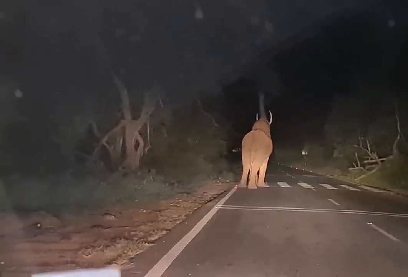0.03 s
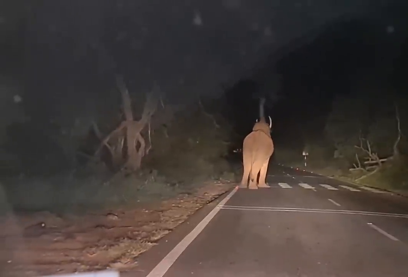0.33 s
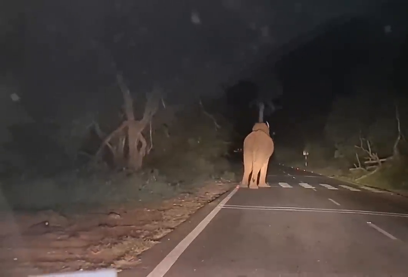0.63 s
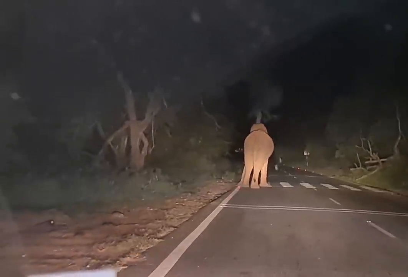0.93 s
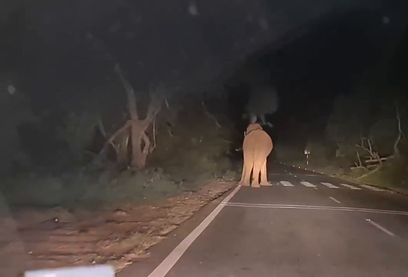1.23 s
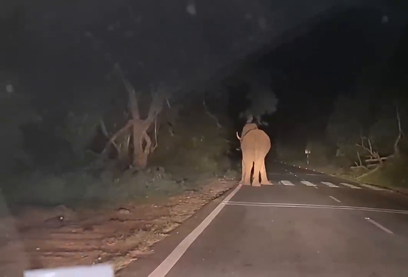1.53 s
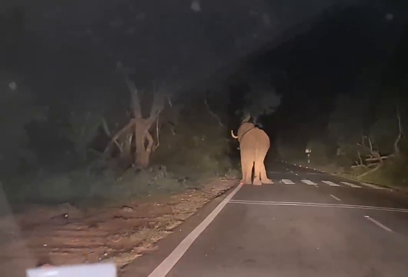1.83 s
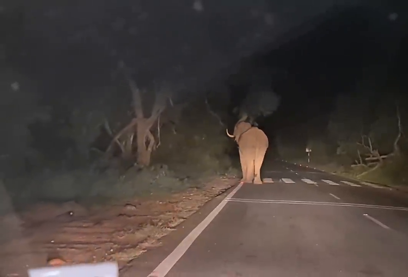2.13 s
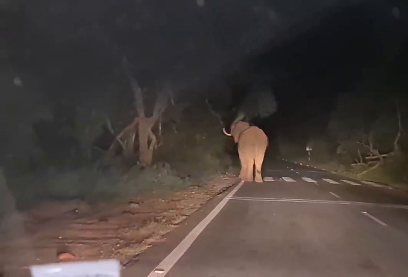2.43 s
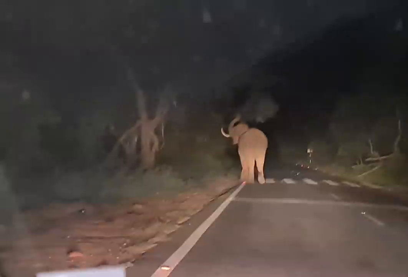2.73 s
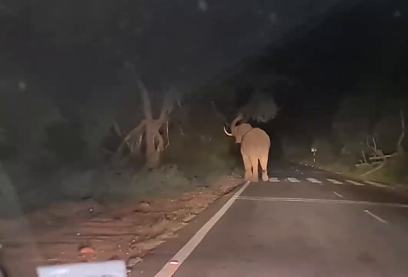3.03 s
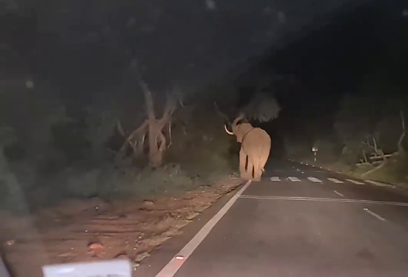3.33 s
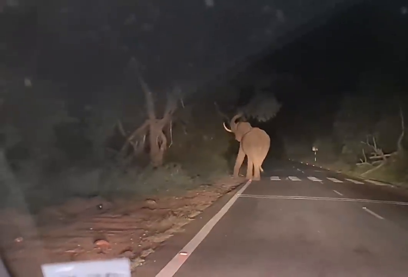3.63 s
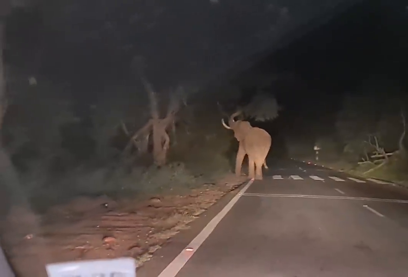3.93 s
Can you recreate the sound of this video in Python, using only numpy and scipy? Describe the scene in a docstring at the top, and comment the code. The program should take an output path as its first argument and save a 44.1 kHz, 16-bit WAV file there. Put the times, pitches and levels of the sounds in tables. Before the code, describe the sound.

Crickets chirp beside a forest road at night, a loud near one overlapping with a second about once a second. Farther crickets and thin, high insect trills continue behind them over a faint, low rumble.

```python
"""Night crickets by a forest road

A near cricket, a second farther off and distant ones chirp in turn. Each chirp is a run of
wing strokes, each stroke a gliding tone with a faint scrape. Small insects trill and lisp
high above them, over a far chorus, faint ticks and hoots, and a low, steady rumble."""
import sys
import numpy as np
from scipy import signal
from scipy.fft import rfft, irfft, next_fast_len
from scipy.io import wavfile
from scipy.ndimage import map_coordinates

SR = 44100
rng = np.random.default_rng(int(sys.argv[2]) if len(sys.argv) > 2 else 0)


def transcribe(u):
    """Save the signal u as a 16-bit wav file named by the first command-line argument.

    u: samples, shape (n,) or (channels, n), limited to [-1, 1]; the rate is SR.
    q: integer samples, one column per channel.
    """
    v = np.clip(np.atleast_2d(u).T, -1, 1)
    q = np.round(v * 32767).astype(np.int16)
    wavfile.write(sys.argv[1], SR, q)


N = 176400


def crickets():
    """Singers at three distances; the farther, the more sound arrives by way of the trees."""
    # chirps: first stroke t/s, last stroke t/s, level/dB, f/Hz
    near_chirps = [(.7370, 1.0050, -15.5, 3867), (1.6995, 1.9405, -14, 3872), (2.6680, 2.9085, -14, 3863),
                   (3.5845, 3.8110, -13.5, 3853)]
    second_chirps = [(-.2490, .0635, -20, 3802), (.7115, 1.0110, -18, 3846), (1.5815, 1.8950, -18.5, 3803),
                     (2.5065, 2.8215, -19, 3820), (3.3185, 3.5870, -19, 3812)]
    distant_chirps = [(-.110, .190, -35.5, 3854), (.593, .900, -32, 3810), (.790, 1.085, -32.5, 3832),
                      (1.466, 1.770, -32.5, 3794), (1.780, 2.080, -33, 3816), (2.345, 2.660, -33, 3806),
                      (2.640, 2.940, -31.5, 3810), (3.169, 3.480, -31.5, 3842), (3.700, 4.010, -39, 3893)]
    # one wing stroke: t/ms, pitch offset/Hz, levels of harmonics 1, 2, 3/dB
    near_stroke = [(0, 210, -13, -38, -42), (1.2, 160, -2, -34, -38), (2.8, 105, 1, -33, -35),
                   (5.8, -20, -2.5, -24, -34), (8.3, -85, -.5, -26, -38), (10, -160, -6, -35, -36),
                   (12.3, -230, -20, -40, -40), (13.6, -60, -12, -35, -42), (15.3, 0, -18, -40, -46)]
    second_stroke = [(0, -70, -14, -34, -46), (2, 10, -5, -28, -40), (4.5, 60, 1, -24, -33),
                     (7, 45, -4, -24, -25), (9.3, 35, -12, -27, -24), (11.8, -70, -8, -23, -34),
                     (14.5, -130, -15, -34, -46)]
    distant_stroke = [(0, 125, -2.5, -44, -68), (2.5, 76, 3.5, -21.5, -44), (7, -2, 1, -23.5, -29),
                      (12.5, -130, -2.5, -42, -46)]
    # phase shift, + at the left microphone, - at the right: f/Hz, phase/rad
    mic_phase = [(3500, -.04), (4300, -.1), (7700, .65), (11500, .7)]
    near = cricket(near_chirps, near_stroke, rate_hz=66.5, jitter_s=2e-5, onset_db=-2,
                   scrape_db=-34, overtone_db=1, scatter_db=0.3, detune=0.003)
    second = cricket(second_chirps, second_stroke, rate_hz=63.7, jitter_s=2e-5, onset_db=-1.5,
                     scrape_db=-40, overtone_db=2, scatter_db=0.3, detune=0.003)
    distant = cricket(distant_chirps, distant_stroke, rate_hz=64.3, jitter_s=2e-4, onset_db=-3,
                      scrape_db=-39, overtone_db=2, scatter_db=1, detune=0.0035)
    mix = (among_trees(near, pan_db=2.2, wet_db=-16, t60_s=0.037)
           + among_trees(second, pan_db=0.7, wet_db=-14, t60_s=0.27)
           + among_trees(distant, pan_db=0.7, wet_db=-1, t60_s=0.16))
    return filtered(mix, lambda hz: np.exp(1j * np.outer([1, -1], curve(hz, mic_phase))))


def cricket(chirps, stroke, rate_hz, jitter_s, onset_db, scrape_db, overtone_db, scatter_db, detune):
    """Each stroke draws scraper over file, catching at first; the wing rings at note and overtones."""
    # wing resonances: f/Hz, gain/dB
    wing_response = [(2800, -24), (3300, -2), (3550, 3), (4100, -2), (4280, -7), (4550, -32), (7000, -17),
                     (7450, 0), (7950, -0.5), (8400, 0), (11000, -2), (11420, 1), (11750, -5.5),
                     (12300, -8), (14700, -15), (15200, -2)]
    # scrape noise: f/Hz, density/dB
    scrape_spectrum = [(1500, -51), (2000, -21), (2400, -9), (3200, -5.5), (4300, 3), (4800, -0.5),
                       (5500, -0.5), (6100, -8.5), (7200, -7.5), (9000, -3), (10400, -12), (11800, -3.5),
                       (12600, -15), (14300, -13.5), (15200, -14), (16000, -10.5)]
    catch_db, catch_s = 12, 0.0024
    t, tone, scrape = clock(), np.zeros(N), np.zeros(N)
    knots_ms, glide_hz, note_db, second_db, third_db = np.transpose(stroke)
    harmonics_db = [note_db, second_db + overtone_db, third_db + overtone_db, note_db - 41]
    length_s = knots_ms[-1] / 1000
    for first_s, last_s, level_db, pitch_hz in chirps:
        draws = rng.standard_normal((40, 3))
        count = round((last_s - first_s) * rate_hz) + 1
        for k, due_s in enumerate(np.linspace(first_s, last_s, count)):
            late, soft, sharp = draws[k]
            start_s = due_s + jitter_s * late
            span = slice(*np.searchsorted(t, [start_s, start_s + length_s]))
            age_s = t[span] - start_s
            edge_s = np.minimum(age_s, length_s - age_s)
            fade = lambda fade_s: np.sin(np.pi / 2 * np.clip(edge_s / fade_s, 0, 1)) ** 2
            along = lambda column: np.interp(1000 * age_s, knots_ms, column)
            cycles = np.cumsum(pitch_hz + along(glide_hz)) * (1 + detune * sharp) / SR
            phase = 2 * np.pi * (cycles + pitch_hz * age_s[:1])
            wave = sum(amp(along(db)) * np.sin(h * phase) for h, db in enumerate(harmonics_db, 1))
            gain = amp(level_db - scatter_db * soft + onset_db * 0.5 ** k)
            catch = 1 + amp(catch_db) * np.exp(-age_s / catch_s)
            tone[span] += gain * fade(0.00096) * wave
            scrape[span] += gain * fade(0.00067) * catch
    ring = filtered(tone, lambda hz: amp(curve(hz, wing_response)))
    return ring + amp(scrape_db) * scrape * noise(scrape_spectrum, correlation=0.92)


def among_trees(x, pan_db, wet_db, t60_s):
    """A panned source plus scatter from the trees, much alike at both microphones."""
    t = np.arange(SR // 2) / SR
    mid, side = rng.standard_normal((2, len(t))) * amp(-60 * t / t60_s) * amp([[0], [-7]])
    echo = signal.fftconvolve(x, np.array([mid + side, mid - side]), axes=1)[:, :N]
    return (x + amp(wet_db) * np.std(x) * unit(echo)) * amp([[pan_db / 2], [-pan_db / 2]])


def chorus():
    """Many far crickets blur into a fluttering band."""
    # band: f/Hz, density/dB
    spectrum = [(2900, -33), (3350, -30), (3600, -10.5), (3850, 1), (4050, -10), (4350, -40.5), (5000, -39),
                (6800, -69), (7700, -37), (8600, -32)]
    # envelope: t/s, level/dB
    levels = [(0, -31.5), (.35, -58), (.55, -49), (1.2, -48), (1.4, -53), (2.15, -54.5), (2.3, -46),
              (3.1, -51.5), (4, -52.5)]
    return amp(curve(clock(), levels)) * noise(spectrum, correlation=0.43)


def paired_trill():
    """One insect trills throughout: pulse pairs over a steady floor."""
    # pulse pairs: t/s, rate/Hz
    pair_rates = [(0, 16.65), (.6, 16.62), (1, 16.45), (2, 16.67), (2.5, 16.61), (3, 16.45), (4, 16.46)]
    # band: f/Hz, density/dB
    spectrum = [(7800, -33), (8800, -19.5), (9200, -12), (9480, -2.5), (9800, -12), (10250, -16),
                (11000, -38)]
    pulse_s, gap_s, floor_db = 0.0032, 0.0204, -10.5
    rate_hz = curve(clock(), pair_rates)
    offset_s = ((np.cumsum(rate_hz) / SR + 0.5) % 1 - 0.5) / rate_hz
    pairs = bump(offset_s, pulse_s) + 0.75 * bump(offset_s - gap_s, pulse_s)
    return amp(-50) * (pairs + amp(floor_db)) * noise(spectrum, correlation=0.61)


def even_trill():
    """A fainter insect joins halfway, pulsing evenly."""
    # band: f/Hz, density/dB
    spectrum = [(7000, -60), (7900, -3), (8500, -2), (9200, 2), (10300, -6), (11500, -22)]
    start_s, rise_s, rate_hz = 2.12, 0.08, 36
    age_s = clock() - start_s
    fade_in = np.clip(age_s / rise_s + 0.5, 0, 1)
    pulses = (0.5 + 0.5 * np.cos(2 * np.pi * rate_hz * age_s)) ** 2
    return amp(-56.5) * fade_in * pulses * noise(spectrum, correlation=0.33)


def lisps():
    """A bush cricket's short, very high swells, about once a second."""
    # lisps: t/s, half width/s, level/dB
    calls = [(.06, 0.023, -53), (0.363, 0.022, -47), (1.265, .014, -50), (2.085, 0.023, -47),
             (3.215, 0.02, -46), (3.947, .015, -53)]
    # band: f/Hz, density/dB
    spectrum = [(10500, -40), (13000, -14), (14300, -2), (15200, 9), (16000, 4)]
    return swells(calls) * noise(spectrum, correlation=0.24)


def ticks():
    """Tiny noise bursts that die at once: a few high clicks, and wing scrapes as the second cricket starts its
    chirps."""
    # bursts: t/s, f/Hz, level/dB
    bursts = [(.137, 14000, -53), (.151, 13500, -44), (0.177, 7400, -44), (0.969, 13000, -34),
              (1.268, 12800, -54), (1.498, 7060, -45), (1.611, 6100, -43), (2.526, 6000, -44),
              (2.542, 6100, -47), (3.335, 6000, -46), (3.350, 5800, -41), (3.57, 2660, -39.5)]
    decay_s, width_oct = 0.0045, 0.18
    out = np.zeros((2, N))
    for start_s, centre_hz, db in bursts:
        age_s = clock() - start_s
        passband = lambda hz: np.exp(-(np.log2((hz + 1) / centre_hz) / width_oct) ** 2 / 2)
        band = filtered(rng.standard_normal((2, N)), passband)
        out += amp(db) * (age_s > 0) * np.exp(-abs(age_s) / decay_s) * unit(band)
    return out


def hoots():
    """Faint, far, nearly pure notes."""
    # hoots: t/s, half width/s, level/dB
    calls = [(1.335, 0.034, -66), (3.427, 0.042, -61.5), (3.90, 0.023, -62), (3.99, .03, -64)]
    pitch_hz = 577 + 12 * wobble(40)
    return swells(calls) * unit(np.sin(2 * np.pi * np.cumsum(pitch_hz) / SR))


def night_air():
    """Low rumble, faint hiss and a weak, wavering hum."""
    # noise beds: f/Hz, density/dB
    rumble_spectrum = [(15, -59), (25, -33), (92, -19), (118, -8.5), (200, -4), (234, -2), (427, -6),
                       (571, -7), (893, -10), (1290, -12), (2600, -19.5), (3380, -51), (5720, -120)]
    hiss_spectrum = [(2200, -14), (3000, 0), (4500, -5.5), (7000, -4.5), (11000, -6), (15500, -11.5)]
    hum_hz = 133 + 2.46 * wobble(6)
    hum = np.sin(2 * np.pi * np.cumsum(hum_hz) / SR) * amp(7.5 * wobble(4.47))
    rumble = noise(rumble_spectrum, correlation=0.2)
    hiss = noise(hiss_spectrum, correlation=0.12)
    return amp(-58) * rumble + amp(-61) * hiss + amp(-74.5) * unit(hum)


def amp(db):
    """Decibels to gain."""
    return 10 ** (np.asarray(db) / 20)


def unit(x):
    """x scaled to rms 1."""
    return x / np.sqrt(np.mean(x ** 2) + 1e-20)


def clock():
    """Sample times in s."""
    return np.arange(N) / SR


def curve(x, table):
    """Linear interpolation in a two-column table."""
    return np.interp(x, *np.transpose(table))


def bump(offset_s, half_width_s):
    """Gaussian pulse, 1/e at the half width."""
    return np.exp(-(offset_s / half_width_s) ** 2)


def swells(calls):
    """Envelope with one bump per call."""
    return sum(amp(db) * bump(clock() - peak_s, half_width_s) for peak_s, half_width_s, db in calls)


def wobble(rate_hz):
    """Smooth random curve with knots at rate_hz."""
    return map_coordinates(rng.standard_normal(2048), [clock() * rate_hz], mode="wrap")


def filtered(x, response):
    """x through a frequency response, given as a function of Hz."""
    size = next_fast_len(N + 8192)
    return irfft(rfft(x, size) * response(np.fft.rfftfreq(size, 1 / SR)), size)[..., :N]


def noise(spectrum, correlation):
    """Stereo noise of rms 1 with the given spectral shape and left-right correlation."""
    knots_hz, db = np.transpose(spectrum)
    shape = lambda hz: amp(np.interp(np.log(hz + 1), np.log(knots_hz), db))
    low_cut = lambda hz: np.minimum(hz / knots_hz[0], 1) ** 2
    mid, side = filtered(rng.standard_normal((2, N)), lambda hz: shape(hz) * low_cut(hz))
    angle = np.arccos(correlation) / 2
    mid, side = np.cos(angle) * mid, np.sin(angle) * side
    return unit(np.array([mid + side, mid - side]))


def scene():
    """Insects, ticks and hoots over the night air."""
    return (crickets() + chorus() + paired_trill() + even_trill() + lisps()
            + ticks() + hoots() + night_air())


def record(dry):
    """Brick-wall low-pass at the recorder's band limit."""
    return filtered(dry, lambda hz: hz < 15850)


dry = scene()
out = record(dry)
transcribe(out)
```